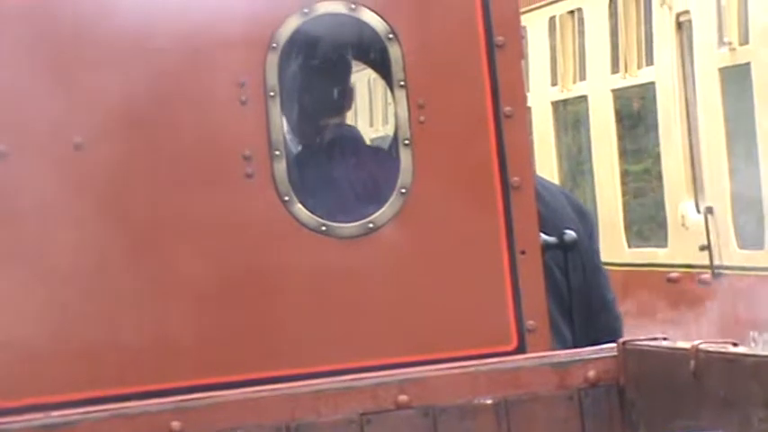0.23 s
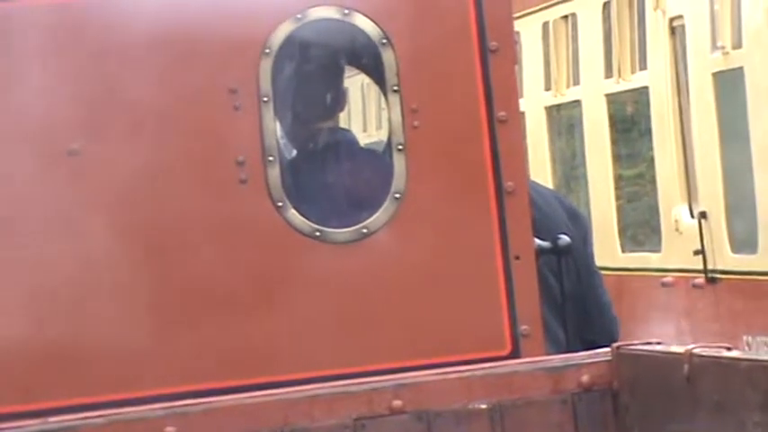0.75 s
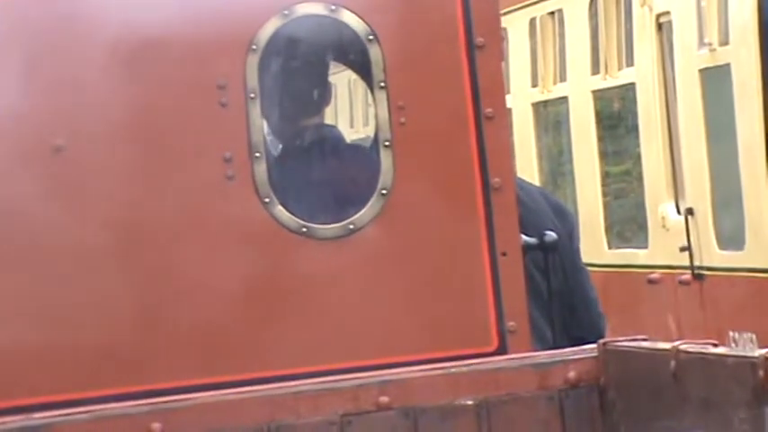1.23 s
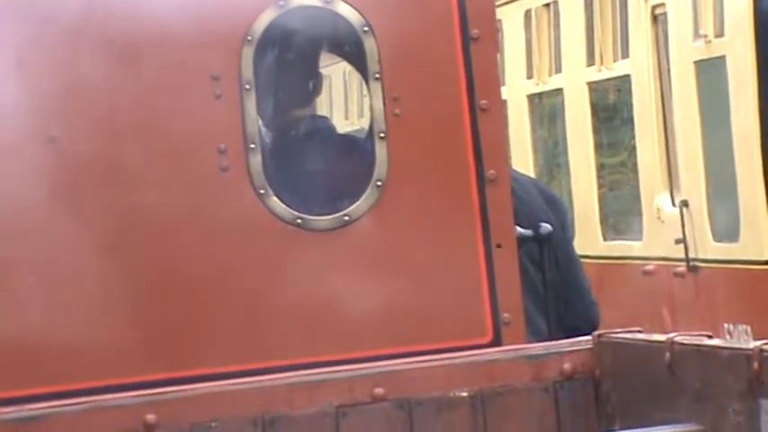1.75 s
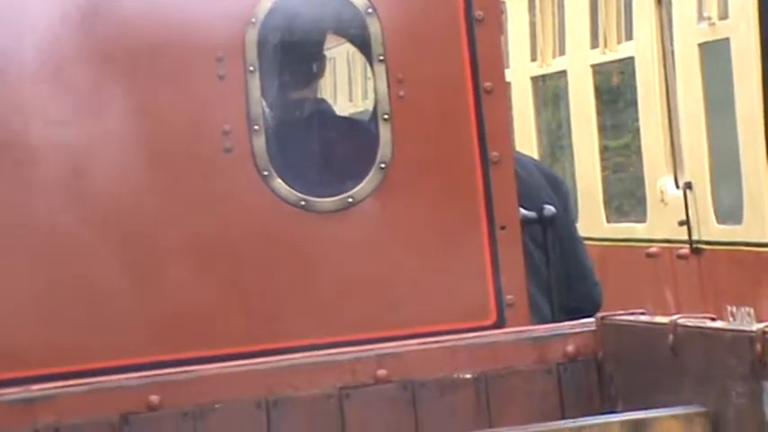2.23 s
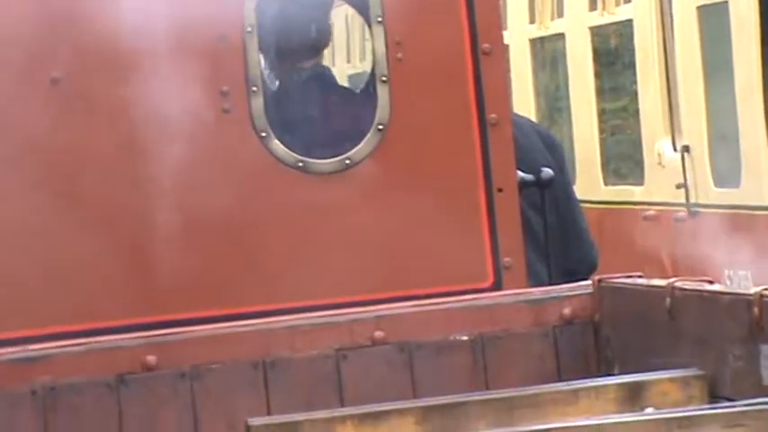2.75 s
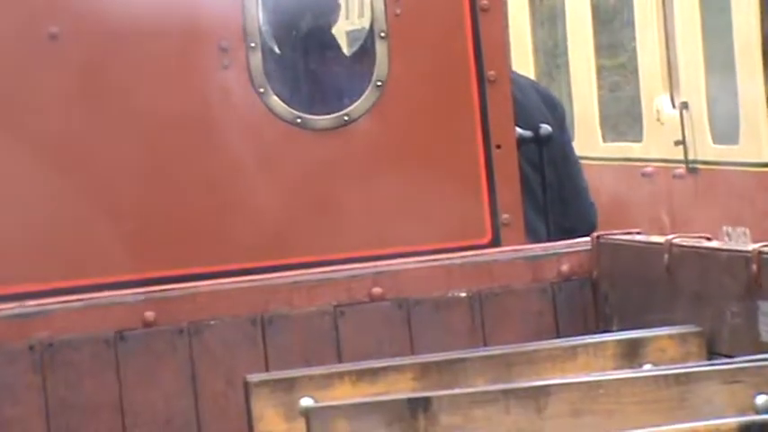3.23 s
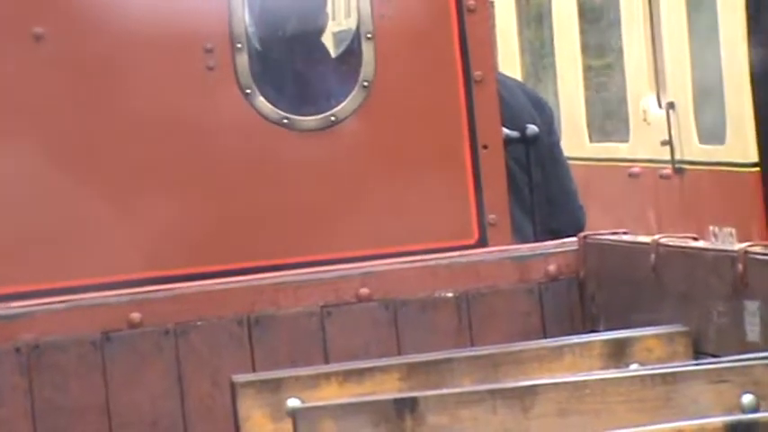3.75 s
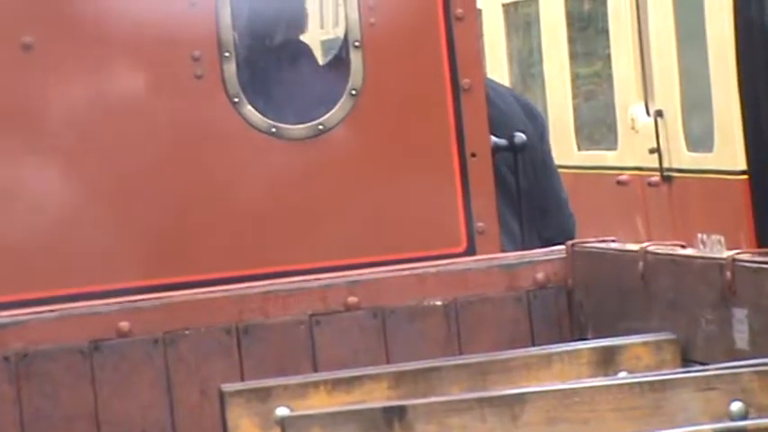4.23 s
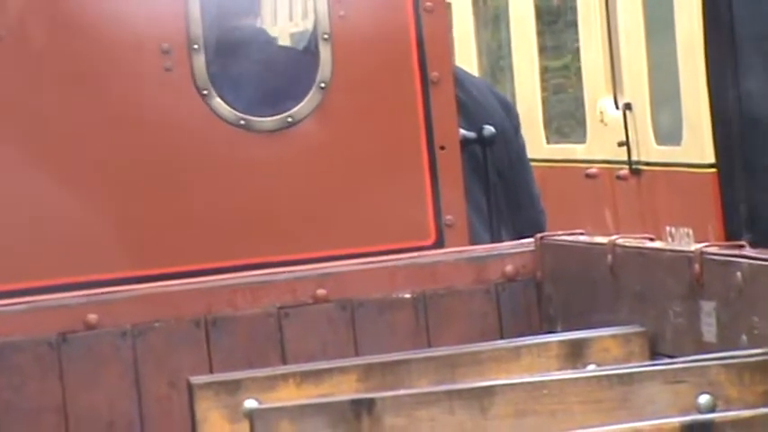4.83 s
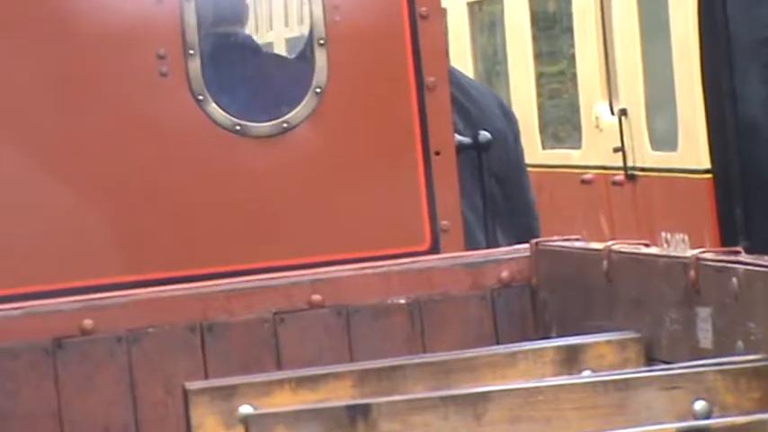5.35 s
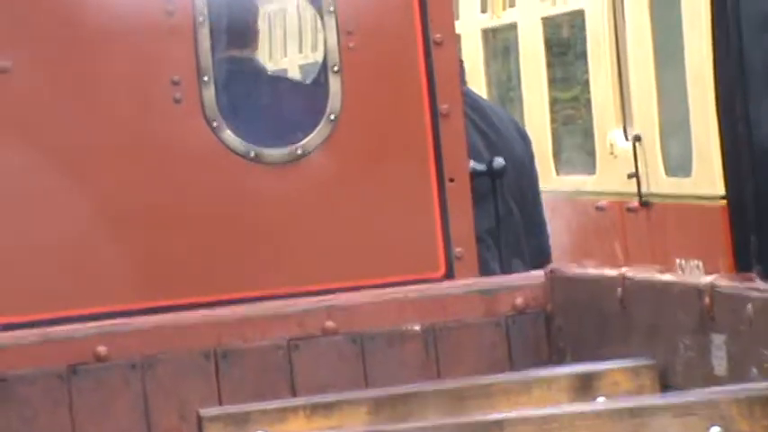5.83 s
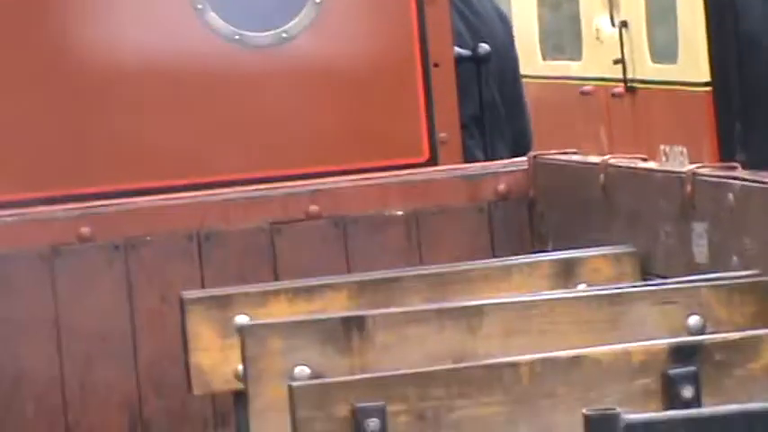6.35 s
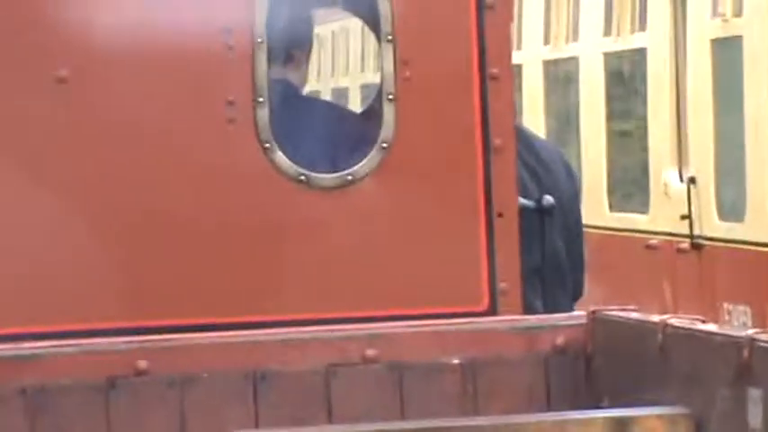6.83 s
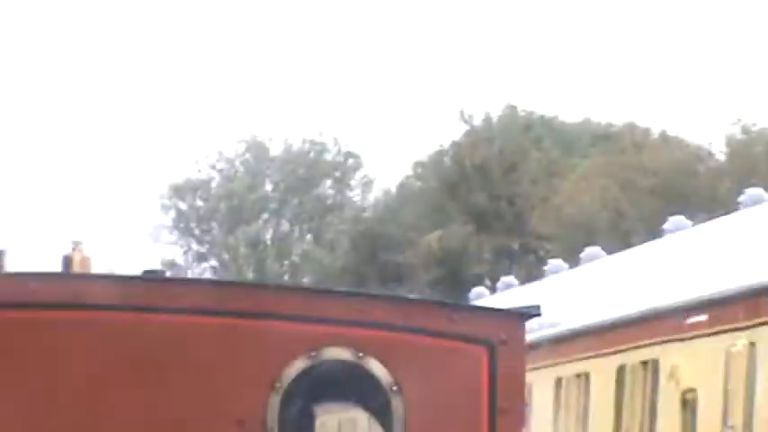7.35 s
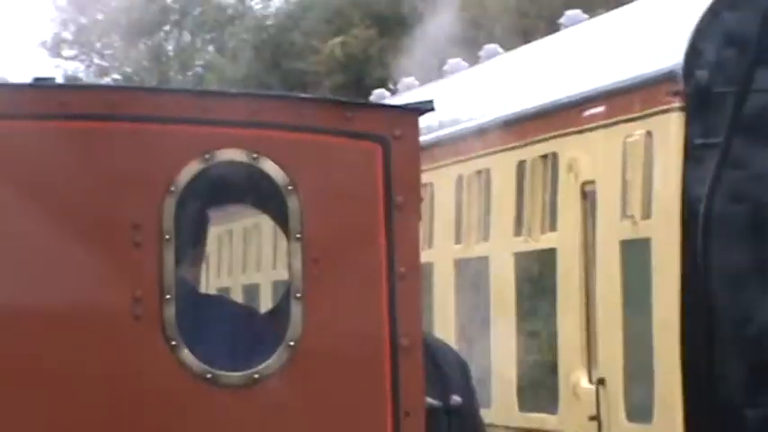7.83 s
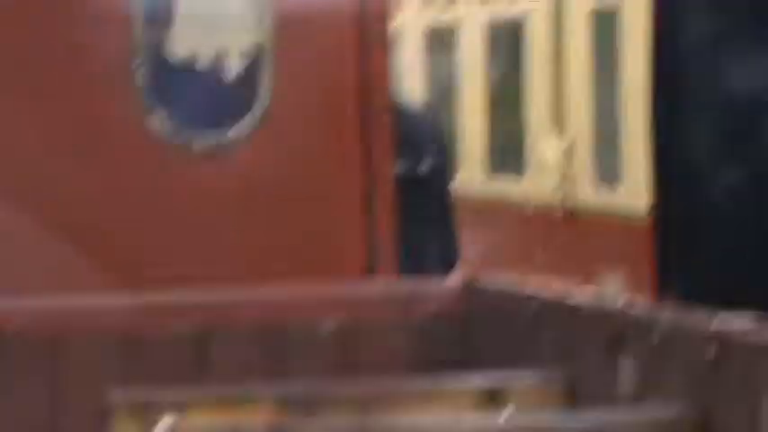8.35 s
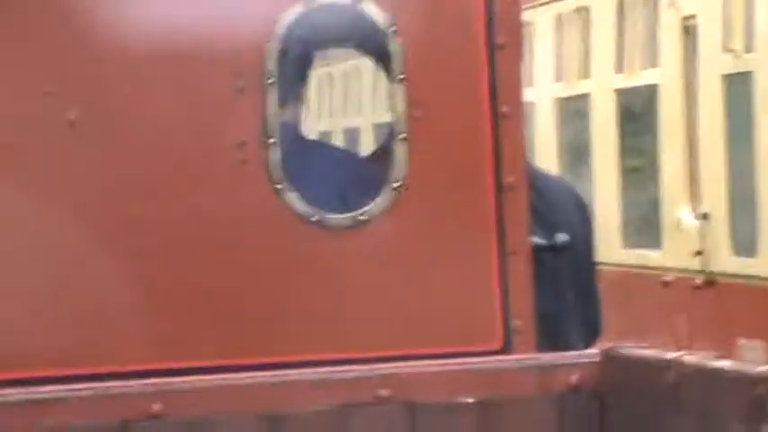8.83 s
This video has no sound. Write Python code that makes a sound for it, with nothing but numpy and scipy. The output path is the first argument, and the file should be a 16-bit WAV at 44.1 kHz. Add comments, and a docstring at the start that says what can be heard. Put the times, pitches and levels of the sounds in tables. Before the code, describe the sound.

A standing steam locomotive hisses loudly and steadily from its safety valve, with a faint low hum and a few dull knocks.

```python
"""A loud hiss of steam from the safety valve of a standing locomotive, heard from close beside it. The
turbulent jet rings the vent pipe: a low hum and low modes from its length, many high modes from its bore. A few
dull knocks sound on the ironwork. The microphone is hand-held, with two ports, gain control and a band limit."""
import sys
import numpy as np
from scipy import signal
from scipy.fft import rfft, irfft, next_fast_len
from scipy.io import wavfile
from scipy.ndimage import uniform_filter1d

SR = 44100
rng = np.random.default_rng(int(sys.argv[2]) if len(sys.argv) > 2 else 0)


def unload_wav(signal):
    """Save mono or channel-first audio to the path in sys.argv[1] as 16-bit WAV at rate SR, clipped to [-1, 1]."""
    wavfile.write(
        sys.argv[1],
        SR,
        np.round(np.clip(np.atleast_2d(signal).T, -1, 1) * 32767).astype(np.int16),
    )


N = 400869

# How strongly the pipe roars, with a brief deep dip of the upper band near 7.3 s: time_s, main_lift_db (near
# 2.7 kHz), upper_lift_db (near 3.9 kHz)
ROAR_LIFTS = [(0, 1, 3), (.6, 1.5, 1.5), (1.3, -0.8, -0.5), (1.8, 2, -0.5), (2.35, 3, 0.5), (2.9, 1.5, -1),
              (3.6, 1.5, -0.5), (4.15, 2.5, 0), (4.75, 0, -1.7), (5.2, 0, -2.5), (6.0, 1.5, -1.8),
              (6.6, -3.5, -2.2), (7.0, -2.5, -1), (7.27, -4.5, -5), (7.55, -4.5, -0.5), (7.95, -1, -.3),
              (8.3, -2, 0), (9.09, -2, -1.5)]
# Bands that go with the main roar or against it: centre_hz, width_octaves, db_per_main_db
ROAR_BANDS = [(70, 0.39, .5), (910, 0.4, -0.27), (1490, .093, 0.7), (1950, 0.055, 0), (3230, .05, -0.34),
              (2670, 0.09, 1.1), (4800, 0.089, 0.4), (14000, .4, -0.03)]
def turbulence():
    """The jet leaving the valve: three unrelated noises share one field of swells and flutter."""
    frames, hz = N // 128 + 5, np.fft.rfftfreq(512, 1 / SR)
    t = np.arange(frames) * 128 / SR
    time_s, main_db, upper_db = np.transpose(ROAR_LIFTS)
    jet_db, surge_db = -19, 0.7
    field_db = jet_db + bump(hz, centre_hz=3850, octaves=0.12) * np.interp(t, time_s, upper_db)
    for centre_hz, octaves, share in ROAR_BANDS:
        lift_db = np.interp(t, time_s, main_db) + surge_db * wander(frames, 50, 30)
        field_db += bump(hz, centre_hz, octaves) * share * lift_db
    treble = np.clip(hz / 11000, 0, 1.3)[:, None]
    field_db -= 2 * treble * np.exp(-t / 1.1)  # the top fizz comes up early on
    field_db += 0.65 * patches(len(hz), frames, span_bins=7, span_frames=16)
    field_db += 0.57 * treble * wander(frames, 9)  # the top of the jet flutters as one
    real, imag = rng.standard_normal((frames, len(hz), 3, 2)).T
    white = real + 1j * imag
    plain = signal.istft(white, nperseg=512, noverlap=384)[1][0, :N]
    swelling = signal.istft(white * gain_of(field_db), nperseg=512, noverlap=384)[1][:, :N]
    return swelling / plain.std()

# The jet between the pipe modes: pitch_hz, relative_level_db
JET_SPECTRUM = [(25, -18), (60, -10), (230, -11), (380, -20), (710, -17), (800, -13), (1100, -12),
                (1860, -8.5), (2300, -7), (3300, -3), (4700, 0.55), (5450, -6), (8900, -10), (10300, -9),
                (13200, -15.5), (15700, -23)]
# Modes of the vent pipe, from its length below about 780 Hz and its bore above: pitch_hz, width_hz, over_jet_db
PIPE_MODES = [(328.8, 15, 10), (495, 41, 6.5), (558, 60, 0), (623, 35, 4), (793.7, 20, 12.5),
              (847.6, 28, 13), (917, 67, 10.5), (1026, 27, 13), (1245, 190, 3.5), (1465, 103, 11.5),
              (1585, 103, 7), (1667, 90, 5.5), (1772, 61, 5.5), (2008, 123, 4.5), (2137, 49, 7),
              (2260, 32, 6), (2360, 66, 4), (2453, 64, 9.5), (2538, 65, 8.5), (2624, 40, 10),
              (2755, 128, 7.5), (2915, 62, 2), (3010, 30, 7), (3404, 100, -0.5), (3646, 100, 3.5),
              (3855, 117, 4.5), (4068, 60, 5), (4870, 28, 2), (5050, 180, -5.5), (7800, 920, -2)]
def steam_hiss(hz):
    """The jet rings the vent pipe, along its length and across its bore, close to the microphone."""
    ring_power = sum(abs(gain_of(db) * resonance(hz, f, width)) ** 2 for f, width, db in PIPE_MODES)
    colour = gain_of(curve_at(JET_SPECTRUM, hz)) * np.sqrt(1 + ring_power)
    hiss_band = (hz > 3300) & (hz < 10000)
    colour /= np.sqrt(2 * np.sum(colour[hiss_band] ** 2) / next_fast_len(N))
    return filtered(turbulence(), colour)

def shimmer(hiss):
    """Dense modes leave a fine treble ripple, which drifts as the plume and the microphone move."""
    hz, t, spectrum = signal.stft(hiss, SR, nperseg=2048)
    ripple = patches(len(hz), len(t), span_bins=2, span_frames=40)
    depth_db = 1.8 * np.clip((hz - 1000) / 1500, 0, 1)
    return signal.istft(spectrum * gain_of(depth_db[:, None] * ripple), SR, nperseg=2048)[1][:, :N]

# Two close, beating modes of the pipe's length: pitch_hz, width_hz, relative_level_db
LENGTH_MODES = [(152, 10, 0), (163.2, 16.4, 1)]
# Slow course of the hum: time_s, level_db
HUM_LEVELS = [(0, -39), (.35, -37), (.9, -39), (1.4, -35), (1.9, -37), (2.4, -36.5), (3.1, -41),
              (3.8, -33.5), (4.5, -38.5), (5.3, -35), (6.35, -40.5), (6.7, -36.5), (7.3, -32.5), (7.6, -39),
              (8.3, -35), (9.09, -38)]
def pipe_hum(hz):
    """The pipe's self-limiting drone: narrow noise held to a slow level, wavering about it."""
    colour = sum(gain_of(db) * abs(resonance(hz, f, width)) for f, width, db in LENGTH_MODES)
    drone = filtered(rng.standard_normal((3, N)), colour)
    held = drone / (uniform_filter1d(drone ** 2, size=5000) + .1 * drone.var()) ** 0.49
    level_db = np.interp(np.arange(N) / SR, *np.transpose(HUM_LEVELS))
    waver_db = 1.5 * wander(N, 4000, 3000)  # a few times a second
    return unit_rms(held) * gain_of(level_db + waver_db)

# Blows on the ironwork: start_s, relative_level_db, thud_db, ring_db (both against the middle), t60_s
BLOWS = [(1.328, -27, -12, -16, .15), (1.357, -25, -3, -11, 0.31), (1.495, -35, -6, -10, 0.24),
         (5.557, -31, -6, -4, 0.22), (6.637, -35, -12, 3, 0.16), (6.676, -34, -10, 0, 0.25),
         (7.163, -20, -20, -9, .06), (7.189, -13, -7, -6.5, .16), (7.208, -17, 0, -3.5, 0.2),
         (7.236, -21, -1, -0.5, 0.36)]
# Modes of the ironwork: pitch_hz, width_hz, relative_level_db
IRON_MODES = [(77.5, 24, 4.5), (117, 18, -6), (162, 33, 10), (199, 40, 6.5), (258, 27, 4), (313, 47, 3),
              (406, 68, 0), (509, 24, 6), (578, 32, 2), (690, 50, -6)]
def iron_knocks(hz):
    """Each blow is a tap and a dying rattle that ring the low, middle and upper modes of the iron."""
    shake, t = np.zeros((3, N)), np.arange(SR // 2) / SR
    for start_s, level_db, thud_db, ring_db, t60_s in BLOWS:
        attack = np.minimum(t / 0.0057, 1)
        rattle = rng.standard_normal(len(t)) * attack * gain_of(level_db - 60 * t / t60_s)
        rattle[0] = 28 * gain_of(level_db)  # the tap itself
        span = shake[:, round(start_s * SR):][:, :len(t)]
        span += gain_of([[thud_db], [0], [ring_db]]) * rattle[:span.shape[1]]
    body = np.zeros((3, len(hz)), complex)
    for pitch_hz, width_hz, level_db in IRON_MODES:
        register = int(pitch_hz > 240) + int(pitch_hz > 360)  # low, middle or upper
        body[register] += gain_of(level_db) * resonance(hz, pitch_hz, width_hz)
    return filtered(shake, gain_of(15.0) * body).sum(0)

def gain_of(db):
    return 10 ** (np.asarray(db) / 20)

def unit_rms(x):
    return x / np.sqrt(np.mean(x ** 2) + 1e-20)

def curve_at(points, hz):
    pitch_hz, value = np.transpose(points)
    return np.interp(np.log(hz + 1), np.log(pitch_hz + 1), value)

def resonance(hz, centre_hz, width_hz):
    """A resonance passed twice, for steep sides; 1 at its centre."""
    return 1 / (1 + 2j * (hz - centre_hz) / width_hz) ** 2

def bump(hz, centre_hz, octaves):
    """A bell curve over log frequency, as a column."""
    return np.exp(-.5 * (np.log2((hz + 1) / centre_hz) / octaves) ** 2)[:, None]

def filtered(x, gain):
    return irfft(rfft(x, next_fast_len(N)) * gain, next_fast_len(N))[..., :N]

def wander(count, *spans):
    """A random drift: noise averaged over each span in turn."""
    drift = rng.standard_normal(count)
    for span in spans:
        drift = uniform_filter1d(drift, span)
    return unit_rms(drift)

def patches(bins, frames, span_bins, span_frames):
    """Random patches over frequency and time."""
    across_pitch = uniform_filter1d(rng.standard_normal((frames, bins)).T, span_bins, axis=0)
    return unit_rms(uniform_filter1d(across_pitch, span_frames, axis=1))

# Steam that both microphone ports hear alike: pitch_hz, power_share
PORT_COHERENCE = [(25, .42), (60, 0.78), (95, 1), (135, 0.97), (400, 0.91), (1000, 0.88), (2500, 0.97),
                  (5000, 0.85), (9000, 0.68), (12000, 0.76), (15000, .5)]
# Phase between the ports: pitch_hz, left_lead_rad
PORT_PHASE = [(30, .2), (100, 0.4), (250, 1.27), (480, 1.27), (1100, 1.21), (2000, 0.79), (5000, 0.48),
              (6300, .22), (12500, .15), (14000, .9), (15500, 1.05)]
# Level between the ports: pitch_hz, left_minus_right_db
PORT_BALANCE = [(30, 0.5), (200, 0.2), (700, 0.5), (900, -3), (1150, 0.5), (1700, 1.2), (2500, 0.7),
                (10000, 1), (14000, -.3)]
def scene():
    """Steam and knocks reach the two microphone ports beside the locomotive."""
    hz = np.fft.rfftfreq(next_fast_len(N), 1 / SR)
    steam = shimmer(steam_hiss(hz)) + pipe_hum(hz)  # rows: common, left alone, right alone
    share = np.clip(curve_at(PORT_COHERENCE, hz), 0, 1)
    common = filtered(steam[0], np.sqrt(share)) + iron_knocks(hz)
    separate = filtered(steam[1:], np.sqrt(1 - share))
    left_gain = np.exp(.5j * curve_at(PORT_PHASE, hz)) * gain_of(.5 * curve_at(PORT_BALANCE, hz))
    return filtered(common + separate, np.array([left_gain, 1 / left_gain]))

def record(dry):
    """Gain control dips the hiss under the loudest knocks; then the band limit."""
    threshold_db, recovery_db_per_s, edge_hz = -17.0, 20.0, 15730
    power_db = 10 * np.log10(abs(uniform_filter1d((dry ** 2).mean(0), 1300)) + 1e-12)
    fall_db = np.arange(N) * recovery_db_per_s / SR
    held_peak_db = np.maximum.accumulate(power_db + fall_db) - fall_db
    over_db = np.maximum(held_peak_db - threshold_db, 0)
    ducked = dry / gain_of(0.43 * uniform_filter1d(over_db, 400))
    lowpass = signal.firwin(1023, edge_hz, window=("kaiser", 9), fs=SR)
    return signal.oaconvolve(ducked, lowpass[None], "same")

dry = scene()
out = record(dry)
unload_wav(out)
```